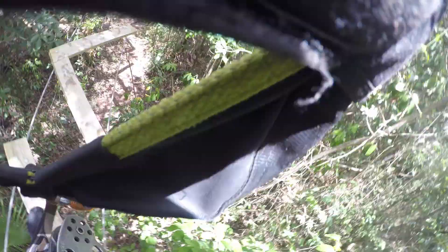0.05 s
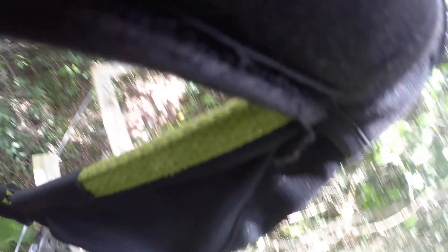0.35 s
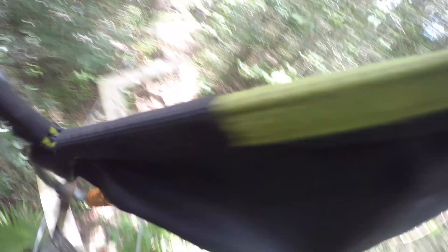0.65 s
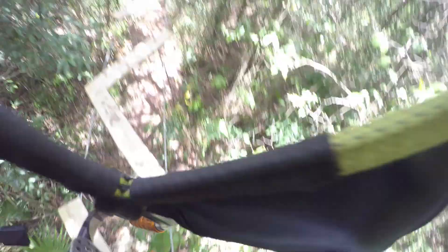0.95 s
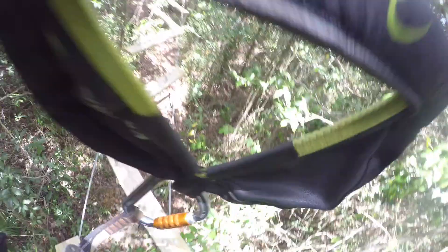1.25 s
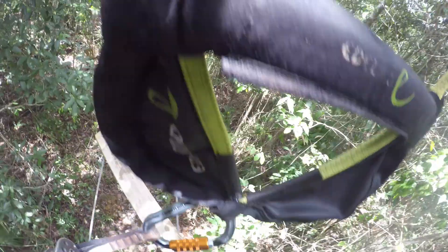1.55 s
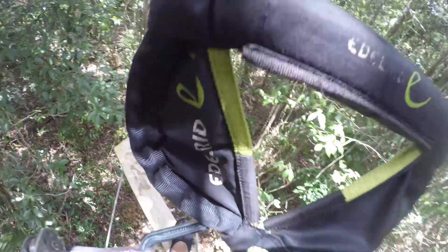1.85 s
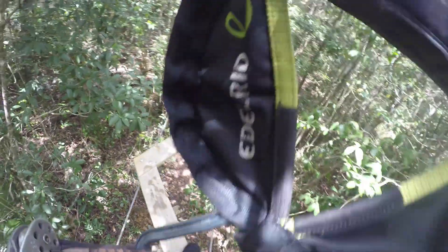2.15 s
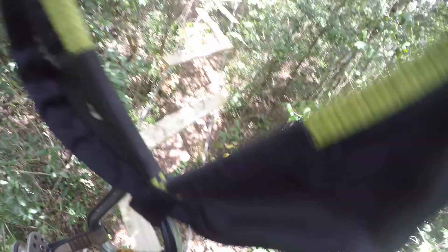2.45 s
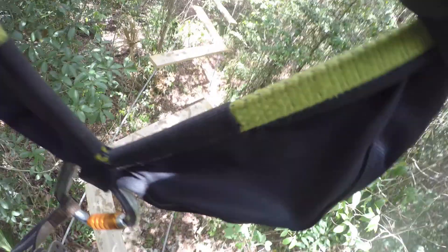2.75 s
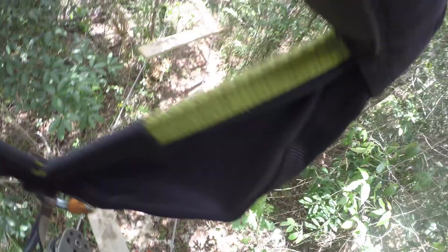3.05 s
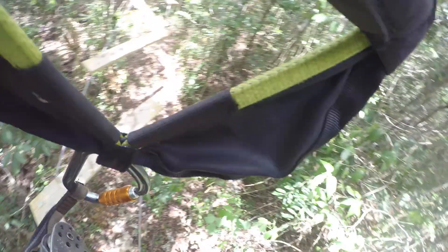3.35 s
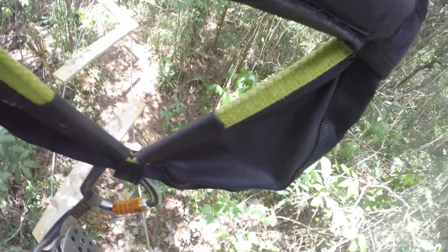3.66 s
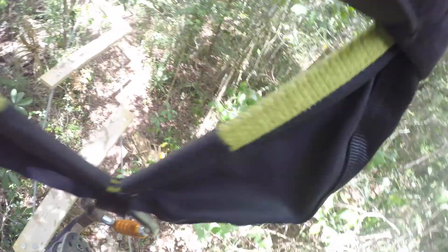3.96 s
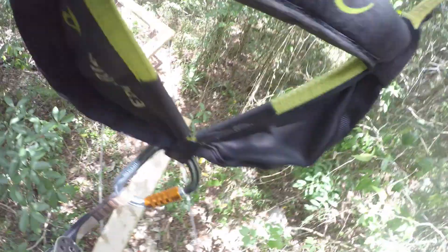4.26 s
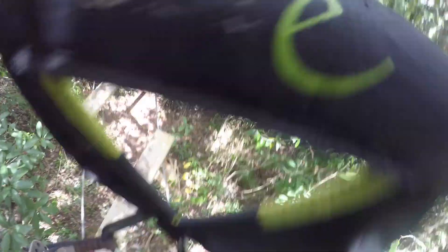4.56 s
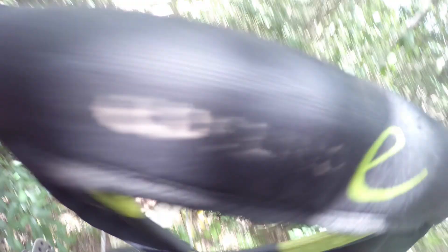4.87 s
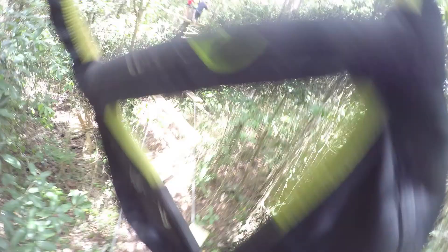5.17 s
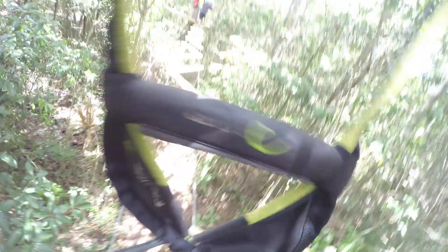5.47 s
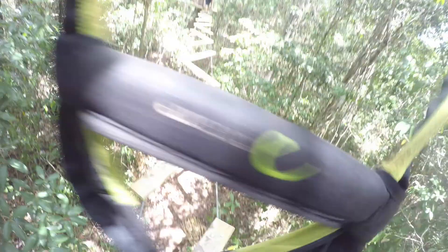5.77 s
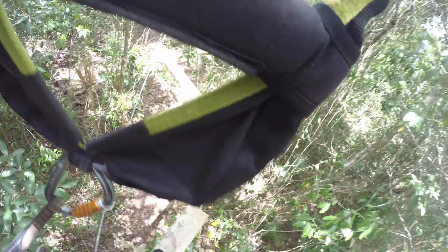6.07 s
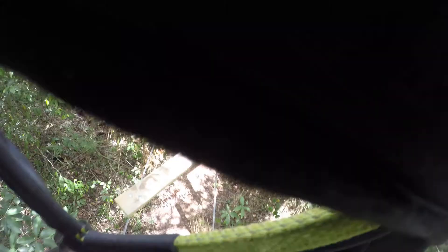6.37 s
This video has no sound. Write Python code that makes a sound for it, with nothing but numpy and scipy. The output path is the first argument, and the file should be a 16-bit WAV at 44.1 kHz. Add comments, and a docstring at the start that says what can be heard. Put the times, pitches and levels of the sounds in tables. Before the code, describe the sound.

Zip line gear sounds very close to a body-worn microphone, outdoors with no echo. Cloth rustle and low buffeting swell and fade throughout. Nylon swishes, light knocks and tiny high tinkles open the sound. From 0.5 to 0.8 seconds come heavy low thumps, gritty strap cracks and a hard steel clank, trailing into rubbing. After a lull from 1 to 1.7 seconds, the pulley ticks quickly and lightly along the cable with a faint whirr, continuing unevenly until about 6 seconds. Between 1.8 and 3.2 seconds carabiners knock hollowly and scrape, loudest near 2.1, 2.4 and 2.7. A quieter stretch follows with rustling and scattered knocks, including a dull bump at 4.7 and a jolt at 5.4. At 6.3 seconds the loudest thump and a sharp strap crunch briefly overload the microphone, leaving soft nylon hiss until about 6.6.

```python
"""Hollow metal knocks, scrapes and quick ticks sound over rustling cloth and low thumps.
A rider hangs from a zip line in a wood, with a small cased camera worn next to the gear.
Carabiners (steel clips) and the pulley knock and slide, the pulley taps the cable's strands,
and straps crunch over the case. Jolts reach the microphone as thumps; the hardest overload it."""
import sys
import numpy as np
from scipy import signal
from scipy.fft import rfft, irfft
from scipy.io import wavfile
from scipy.ndimage import uniform_filter1d

SR = 44100
rng = np.random.default_rng(int(sys.argv[2]) if len(sys.argv) > 2 else 0)


def generate_wav(sig):
    """Save sig (samples, or channels by samples) to the path in sys.argv[1] as 16-bit PCM at SR."""
    pcm = np.round(np.clip(np.atleast_2d(sig).T, -1, 1) * 32767).astype(np.int16)
    wavfile.write(sys.argv[1], SR, pcm)


N = 291942

# the dull tone of cloth and slings: f/Hz, level/dB
CLOTH_TONE = [(80, -19), (170, -3.5), (290, -0.5), (420, -5), (560, -2), (770, 1), (1000, -4),
              (1350, -13.5), (1650, -8.5), (1900, -9.5), (2300, -18), (3000, -27), (9000, -52)]
# modes (pitches a thing rings at) of the pulley's side plates: f/Hz, width/Hz, level/dB
PULLEY_MODES = [(2600, 240, 2), (3840, 170, -1.5), (4600, 300, -3), (5980, 330, -4.5), (8100, 600, -10.5),
                (9240, 440, -10), (12400, 3000, -15)]
# modes of the case's shell: f/Hz, width/Hz, level/dB
SHELL_MODES = [(1870, 300, 5.5), (1650, 100, -16.5)]


def undb(db):
    """Turn decibels into a gain to multiply by."""
    return 10 ** (np.asarray(db) / 20)


def level(x, db):
    """Scale to an average (rms) level."""
    return x * undb(db) / np.sqrt(np.mean(x ** 2) + 1e-20)


def peak(x, db):
    """Scale to a peak level."""
    return x * undb(db) / (np.abs(x).max() + 1e-20)


def during(x, length, db):
    """Scale to an average level, as if all the sound fell within length seconds."""
    return x * undb(db) * np.sqrt(length * SR / np.sum(x ** 2))


def add(track, s, x):
    """Mix a sound into the track at s seconds."""
    i = max(int(s * SR), 0)
    track[i:i + len(x)] += x[:max(N - i, 0)]


def clock(size=4096):
    """The time of each sample in seconds."""
    return np.arange(size) / SR


def follow(curve, column=1):
    """Join a table's points with straight lines over the whole scene."""
    columns = np.transpose(curve)
    return np.interp(clock(N), columns[0], columns[column])


def keep(x, hz, kind, order=2):
    """Keep the "low" or the "high" side of hz."""
    return signal.sosfilt(signal.butter(order, hz, kind, fs=SR, output="sos"), x)


def ring(push, modes, stretch=1):
    """Make modes ring, their pitches times stretch; neighbours swing opposite ways."""
    out = 0
    for k, (hz, width, db) in enumerate(modes):
        resonance = signal.iirpeak(hz * stretch, hz / width, fs=SR)
        out += (-1) ** k * undb(db) * signal.lfilter(*resonance, push)
    return out


def colour(x, tone):
    """Turn each pitch up or down along a tone curve."""
    hz, db = np.transpose(tone)
    f = np.arange(len(x) // 2 + 1) * SR / len(x)
    gain = undb(np.interp(np.log(f + 1), np.log(hz), db))
    return irfft(rfft(x) * gain, len(x))


def flutter(rate, spread_db):
    """A gain that wanders smoothly, taking a new turn rate times a second."""
    hold = int(SR / rate)
    steps = np.repeat(rng.standard_normal(N // hold + 1), hold)
    return undb(spread_db * level(uniform_filter1d(steps, hold)[:N], 0))


def slips(size, rate, scatter_db):
    """Surfaces stick and slip: tiny random pushes, about rate a second."""
    pushes = (rng.random(size) < rate / SR) * rng.choice([-1, 1], size)
    strength = undb(scatter_db * rng.standard_normal(size))
    return pushes * strength + 1e-3 * rng.standard_normal(size)


def stroke(length, rate, scatter_db):
    """A run of slips that swells and stops, with silence after it for the ring."""
    size = int(length * SR)
    return np.pad(slips(size, rate, scatter_db) * signal.windows.tukey(size, .35), (0, 1024))


def contact(chatter, decay_s):
    """One sharp push, then brief chatter of the surfaces."""
    t = clock()
    return (t == 0) + chatter * rng.standard_normal(len(t)) * np.exp(-t / decay_s)


def sway():
    """Air and the swinging body buffet the case; cloth rustles along and swells as the harness shifts."""
    # how hard the rider swings: t/s, level/dB
    swinging = [(0, -32), (.58, -29.5), (.95, -40.5), (1.03, -50.5), (1.64, -53), (1.83, -36),
                (2.38, -35.5), (2.58, -44.5), (2.9, -39), (3.1, -35.5), (3.62, -39.5), (4.15, -40.5),
                (4.42, -36), (4.88, -38), (5.318, -34), (5.82, -47), (6.08, -37), (6.5, -50.5)]
    # harness shifts: t/s of the top, rise/s, fall/s, rustle/dB, hiss/dB
    shifts = [(.09, 0.046, 0.51, -39, -50.5), (.4, 0.038, 0.19, -31, -47),
              (0.581, 0.093, 0.088, -32, -43.5), (1.33, 0.075, 0.21, -51, -66),
              (1.598, .06, 0.39, -55, -64), (2.481, 0.062, 0.075, -42, -54),
              (2.82, 0.33, 0.082, -44.5, -75), (3.1, 0.054, 0.2, -41.5, -78),
              (3.479, 0.1, 0.095, -40, -50.5), (3.7, 0.041, 0.068, -50.5, -59),
              (4.42, 0.074, 0.14, -41, -56.5), (4.71, 0.05, 0.094, -38, -54.5),
              (5, 0.099, 0.23, -45.5, -55), (5.161, 0.018, 0.09, -43, -49),
              (5.286, 0.029, 0.033, -35.5, -51.5), (5.458, 0.06, 0.13, -39, -57.5),
              (6.2, 0.076, 0.24, -50, -61.5), (6.61, 0.12, 0.054, -50, -50)]
    # the low rumble of buffeting: f/Hz, level/dB
    buffet_tone = [(12, -22), (25, 8.5), (45, 1), (72, 1), (105, -3.5), (160, -14.5), (260, -24.5),
                   (600, -62.5)]
    # the bright side of rubbing cloth: f/Hz, level/dB
    hiss_tone = [(1200, -12.5), (2000, 0.5), (3100, -4), (4100, 3), (5200, -6), (6100, -10.5), (7500, -7),
                 (8600, -17), (9700, -11.5), (11500, -21), (13000, -22), (16000, -26.5)]
    t = clock(N)
    motion = undb(follow(swinging))
    rustle_gain, hiss_gain = motion * undb(-14.5), motion * undb(-23.5)
    for s, rise, fall, rustle_db, hiss_db in shifts:
        distance = (t - s) / np.where(t < s, rise, fall)
        swell = undb(-17 * np.minimum(distance ** 2, 20))  # 17 dB down one rise before, one fall after
        rustle_gain = np.hypot(rustle_gain, swell * undb(rustle_db))
        hiss_gain = np.hypot(hiss_gain, swell * undb(hiss_db))
    buffet = level(colour(rng.standard_normal(N), buffet_tone), 0)
    buffet *= motion * flutter(rate=19, spread_db=2.7)
    rustle = level(colour(slips(N, rate=2600, scatter_db=1), CLOTH_TONE), 0)
    rustle *= rustle_gain * flutter(rate=45, spread_db=3)
    hiss = level(colour(slips(N, rate=8000, scatter_db=6.5), hiss_tone), -3.9)
    hiss *= hiss_gain * flutter(rate=35, spread_db=2.6)
    return buffet + rustle + hiss


def nylon_swishes():
    """Smooth nylon brushes past the camera with a soft, bright hiss."""
    # passes of the fabric: t/s, length/s, level/dB
    passes = [(0, 0.088, -42), (0.214, 0.058, -44.5), (6.425, 0.083, -54), (6.549, 0.23, -52)]
    # the tone of sliding nylon: f/Hz, level/dB
    nylon_tone = [(2000, -2.5), (3500, -7), (4700, -1.5), (6100, -5), (7800, -8.5), (9500, -20),
                  (12000, -19.5), (16000, -22)]
    out = np.zeros(N)
    for s, length, db in passes:
        push = stroke(length, rate=6600, scatter_db=4)
        add(out, s, during(colour(push, nylon_tone), length, db))
    return out


def pulley_whirr():
    """The pulley rolls over the twisted strands with a fine whirr; a dulled drone comes down the sling."""
    # strength of the rolling: t/s, level/dB
    rolling = [(0, -87), (1.4, -75.5), (2.05, -77.5), (2.25, -56.5), (2.55, -59.5), (2.9, -63.5),
               (3.2, -77.5), (3.601, -64), (4.4, -69), (4.75, -70), (5.251, -79), (5.751, -60.5),
               (6.049, -65), (6.4, -66.5)]
    plates = ring(slips(N, rate=400, scatter_db=5), PULLEY_MODES)
    whirr = level(keep(plates, 1600, "high"), -.5)
    drone = level(colour(slips(N, rate=11000, scatter_db=3), CLOTH_TONE), -1.5)
    return (whirr + drone) * undb(follow(rolling))


def cable_chirp(start_hz=4070, end_hz=1870, glide_s=.0007, rise_s=.00088, decay_s=.002):
    """High pitches run faster along a cable, so a tap arrives as a tiny falling chirp."""
    t = clock(1024)
    hz = end_hz + (start_hz - end_hz) * np.exp(-t / glide_s)
    envelope = (1 - np.exp(-t / rise_s)) * np.exp(-t / decay_s)
    return peak(np.sin(2 * np.pi * np.cumsum(hz) / SR) * envelope, 0)


def strand_ticks(scatter_db=1.5, rebound_s=.01, rebound_db=-4.5, strays_per_s=19, rattle_s=.0023):
    """The pulley taps each strand and rebounds: the cable chirps and the side plates rattle."""
    # the pulley's run: t/s, strands passed per second, chirp/dB, push on the plates/dB
    run = [(0, 21, -71.5, -46.5), (1.45, 15.6, -53.5, -52), (1.699, 15.1, -44.5, -35.5),
           (2.08, 27.7, -51.5, -46.5), (2.3, 39, -39, -37.5), (2.578, 44, -42.5, -34),
           (2.798, 44, -61, -41), (2.941, 35.5, -51, -34.5), (3.08, 16, -39.5, -37.5),
           (3.55, 26, -39.5, -49), (3.8, 24.1, -40, -37.5), (4.651, 24.4, -38.5, -35.5),
           (4.818, 20, -69, -40), (5.201, 16.7, -80, -40), (5.56, 40.3, -46.5, -44), (5.78, 45, -43, -31),
           (5.972, 49, -50, -42.5), (6.4, 27, -77, -56)]
    t = clock(N)
    passed = np.cumsum(follow(run)) / SR
    taps = np.zeros(N)
    for strand, (offset, tap_luck, lag, rebound_luck) in enumerate(rng.standard_normal((260, 4))):
        s = np.interp(strand + .32 * offset, passed, t, right=2 * t[-1])  # unreached strands stay silent
        add(taps, s, undb([scatter_db * tap_luck]))
        add(taps, s + rebound_s * (1 + .26 * lag), undb([rebound_db + scatter_db * rebound_luck]))
    # weaker stray ticks come from the pulley alone
    strays = (rng.random(N) < strays_per_s / SR) * undb(-11.5 + 6 * rng.standard_normal(N))
    bursts = signal.oaconvolve(taps + strays, np.exp(-clock(1024) / rattle_s))[:N]
    rattle = keep(ring(bursts * rng.standard_normal(N), PULLEY_MODES), 2000, "high")
    chirps = signal.oaconvolve(taps * undb(follow(run, column=2)), cable_chirp())[:N]
    return chirps + rattle * undb(follow(run, column=3))


def gear_body(push, hz):
    """The hollow low ring of the steel gear; its pitch shifts with the load and the point of contact."""
    # loaded steel damped by its slings, when hz is 770: f/Hz, width/Hz, level/dB
    modes = [(550, 160, 0.5), (722, 83, 17.5), (1016, 140, 3.5)]
    return keep(keep(ring(push, modes, hz / 770), 330, "high"), 2100, "low")


def gear_clank(push):
    """The higher ring of the gear; the slings pass little above it."""
    # upper modes of the steel: f/Hz, width/Hz, level/dB
    modes = [(1240, 110, -1), (1493, 200, 1), (1906, 120, 11), (2106, 280, 1.5)]
    clank = ring(push, modes, stretch=1 + .057 * rng.standard_normal())
    return keep(keep(clank, 2450, "low", order=6), 820, "high")


def case_grit(push, top_hz):
    """The gritty ring of the camera case; a softer contact reaches less far up."""
    # bright modes of the case: f/Hz, width/Hz, level/dB
    modes = [(3540, 1900, -2), (4750, 1100, 0.5), (5900, 810, 0.5), (6500, 1200, -2), (7630, 1200, -7),
             (10150, 270, -10), (13500, 2200, -13.5)]
    return keep(keep(ring(push, modes), 1800, "high"), top_hz, "low")


def camera_swing(db, hz, cycles):
    """The camera swings briefly on its mount; more cycles make it swell and fade more slowly."""
    t = clock(8192)
    age = t * hz / cycles
    return peak(-np.sin(2 * np.pi * hz * t) * age * np.exp(-age ** 1.4), db)


def steel_knocks():
    """Steel meets steel with a clank and a click; the jolt runs down the sling and shakes the case."""
    # hits of the gear, mostly carabiners and the pulley, before the trims below: t/s, body/dB, body f/Hz,
    # clank/dB, click/dB, jolt/dB
    hits = [(.059, -31, 687, -28, -40, -15), (.183, -5, 708, -15.5, -27, -16.5),
            (.274, -24, 980, -24, -37, -32), (0.312, -18.5, 1210, -16, -53, -37),
            (.614, -18, 660, -58, -24, -11), (.679, 1.5, 780, 3, 2, -1), (1.4, -39, 830, -35, -64, -32),
            (1.722, -33.5, 770, -40.5, -72, -57), (1.809, -17.5, 670, -17, -30, -41),
            (1.835, -21, 790, -34, -32, -37), (1.95, -17.5, 783, -22, -47, -33),
            (2.0638, 1, 801, -6, -17.5, -14.5), (2.073, -21, 680, -13, -37, -55),
            (2.141, -12.5, 800, -18, -40, -34), (2.272, -6, 928, -16, -27.5, -26.5),
            (2.363, -2.5, 770, -10.5, -31, -12), (2.372, -3.5, 830, -2.5, -19.5, -12),
            (2.679, -7.5, 844, -12.5, -25.5, -19.5), (2.706, -9, 770, -13, -14.5, -7),
            (2.727, -2, 824, -7, -31, -14.5), (2.739, -14, 840, -15.5, -44, -43),
            (2.757, -15.5, 747, -14.5, -44, -19), (2.802, -23.5, 784, -37, -55, -33),
            (2.961, -25.5, 825, -27.5, -36, -23.5), (3.013, -10.5, 810, -10.5, -32, -13.5),
            (3.02, -11, 786, -18, -38, -25), (3.045, -19, 640, -16.5, -28.5, -22),
            (3.15, -20, 760, -24, -51, -19.5), (3.377, -25.5, 690, -22, -49, -22),
            (3.421, -25, 765, -41, -55, -24.5), (4.014, -34.5, 620, -35, -46, -32.5),
            (4.202, -27.5, 818, -32, -60, -30), (4.233, -35.5, 708.6, -45, -63, -29.5),
            (4.314, -30, 880, -28.5, -45, -24.5), (4.429, -19, 745, -25.5, -30, -23.5),
            (4.677, -20.5, 780, -21.5, -16, -13), (5.066, -19, 727, -15.5, -27, -14.5),
            (5.239, -14, 740, -33, -49, -17), (5.348, -18, 900, -15.5, -32.5, -33),
            (5.397, -13.5, 770, -16.5, -18, -7), (5.469, -21, 770, -48, -35, -25.5),
            (5.545, -24, 689, -38, -60, -32), (6.03, -30, 696, -23.5, -34, -44),
            (6.055, -26.5, 770, -24.5, -50, -33), (6.086, -22.5, 756, -20.5, -56, -35),
            (6.262, -17.5, 664, -15, 2.5, -24), (6.594, -32, 700, -49, -46, -31.5)]
    # low modes of the case: f/Hz, width/Hz, level/dB
    thud_modes = [(222, 81, 0), (396, 34, 2.5), (577, 34, 2), (1280, 56, -6)]
    out = np.zeros(N)
    for s, body_db, hz, clank_db, click_db, jolt_db in hits:
        push = contact(chatter=.04, decay_s=.005)
        click = case_grit(contact(chatter=.091, decay_s=.0044), top_hz=8100)
        thud = keep(ring(contact(chatter=.049, decay_s=.0044), thud_modes), 1900, "low", order=3)
        steel = peak(gear_body(push, hz), body_db) + peak(gear_clank(push), clank_db - .5)
        add(out, s - .0004, steel + peak(click, click_db - 7.5))
        add(out, s, peak(thud, jolt_db - 6))
        add(out, s + .00061, camera_swing(jolt_db, hz=80, cycles=.72))
    return out


def strap_snaps():
    """Seams and buckles snap over the case: a bright crack and a ring of the shell."""
    # snaps: t/s, peak of the crack/dB
    snaps = [(.06, -18), (.083, -20.5), (0.391, -23.5), (0.5328, -18.5), (.6091, -12), (0.629, -5),
             (.6355, -2), (0.648, -7.5), (.6955, -3), (.708, -14), (0.7208, -9), (0.7242, -13),
             (0.746, -15.5), (5.173, -28), (6.29, -5), (6.31, 5), (6.3171, -4), (6.332, -17.5),
             (6.342, -21)]
    out = np.zeros(N)
    for s, db in snaps:
        push = contact(chatter=.082, decay_s=.002)
        crack = peak(case_grit(push, top_hz=13000), db)
        shell = peak(keep(ring(push, SHELL_MODES), 3300, "low"), db - 7)
        add(out, s - .0005, crack + shell)
    return out


def gate_tinkles():
    """The loose gate of a carabiner taps and rings very high."""
    # taps of the gate: t/s, peak/dB
    taps = [(.157, -49), (.175, -54), (.282, -53), (.3, -48), (0.335, -45), (1.808, -40), (1.835, -57),
            (2.065, -55.5), (3.046, -52), (3.243, -45.5)]
    # modes of the gate: f/Hz, width/Hz, level/dB
    modes = [(9220, 290, -21.5), (11000, 340, 6.5), (12400, 410, 4)]
    out = np.zeros(N)
    for s, db in taps:
        tinkle = ring(contact(chatter=.073, decay_s=.002), modes)
        add(out, s, peak(keep(tinkle, 8000, "high"), db))
    return out


def strap_rubs():
    """The weave of a strap catches on the case: a low drag, a ring of the shell and grit."""
    # pulls of the strap, before the trims below: t/s, length/s, drag/dB, shell/dB, grit/dB
    pulls = [(0.183, 0.028, -23, -34, -66), (0.61, 0.021, -10.5, -21.5, -31), (0.619, 0.023, -23, -14, -17),
             (0.636, 0.023, -21, -25, -26), (.678, 0.0078, -2, -26, -5),
             (0.688, 0.053, -28.5, -27.5, -25.5), (.738, 0.041, -27.5, -34.5, -37.5),
             (0.789, .018, -59, -44, -44.5), (0.888, 0.066, -26.5, -36.5, -41.5),
             (0.961, 0.031, -41.5, -47.5, -48), (3.83, 0.014, -38.5, -63, -64),
             (4.682, 0.0166, -27, -41, -28.5), (5.399, 0.03, -25.5, -65, -62),
             (6.262, 0.0069, -5, -21, -16), (6.274, 0.0165, -15, -20.5, -32), (6.299, 0.016, -14, -28, -21),
             (6.317, 0.024, -32.5, -28.5, -35.5)]
    # the low tone of the drag: f/Hz, level/dB
    drag_tone = [(60, -7), (130, 5.5), (330, 0.5), (550, -5.5), (800, -11.5), (1100, -13.5), (1500, -33.5),
                 (3000, -63.5)]
    out = np.zeros(N)
    for s, length, drag_db, shell_db, grit_db in pulls:
        push = stroke(length, rate=2200, scatter_db=4.5)
        drag = during(colour(push, drag_tone), length, drag_db)
        shell = keep(ring(push, SHELL_MODES), 2400, "low")
        grit = case_grit(push, top_hz=14000 * undb(.085 * grit_db))  # a harder pull is brighter
        add(out, s, drag + during(shell, length, shell_db - 3) + during(grit, length, grit_db - 5))
    return out


def body_thumps():
    """The rider's body and harness bump the camera and set it swinging."""
    # bumps: t/s, peak/dB, f/Hz, swell time/cycles
    bumps = [(0.286, -16.5, 38.5, 1.07), (.454, -13.5, 58, .36), (0.518, -8.5, 36, 0.86),
             (0.552, -1.5, 48.3, 0.46), (0.605, -6, 46, 0.84), (0.691, -5.5, 39, 0.21),
             (.718, -10, 35.3, .62), (0.884, -19, 75, 0.46), (1.796, -38, 59.6, 1.2), (2.353, -9, 61, 0.55),
             (2.377, -5.5, 80, 0.81), (2.418, -21, 45, 0.83), (2.726, -8.5, 39.6, 0.38),
             (3.161, -20, 99, 0.89), (3.723, -28, 32.6, 0.71), (3.925, -31, 360, 1.44),
             (4.013, -29.5, 227, 0.8), (4.636, -35.5, 288, 1.8), (4.677, -12, 357, 1.03),
             (4.687, -6, 28.7, 0.66), (4.902, -29, 231, 1.35), (6.267, 10, 77.7, 0.46),
             (6.278, -13, 35.8, 0.44), (6.307, -10, 45.5, 0.54)]
    out = np.zeros(N)
    for s, db, hz, cycles in bumps:
        add(out, s, camera_swing(db, hz, cycles))
    return out


def steel_scrapes():
    """Carabiners slide under load and judder, making the steel ring."""
    # slides: t/s, length/s, body level/dB, body f/Hz
    slides = [(.37, 0.012, -33.5, 940), (1.781, .02, -33.5, 756), (1.811, 0.041, -24.5, 718),
              (1.855, 0.047, -30.5, 745), (1.91, 0.048, -30.5, 713), (1.99, 0.11, -28.5, 762),
              (2.04, 0.0073, -36, 1000), (2.104, 0.16, -40.5, 783), (2.15, 0.015, -24, 905),
              (2.231, 0.0077, -26, 1000), (2.283, 0.032, -31.5, 793), (2.986, 0.042, -29.5, 980),
              (3.015, 0.094, -30.5, 770), (4.395, 0.17, -39.5, 815.7), (5.996, 0.09, -41, 793)]
    out = np.zeros(N)
    for s, length, db, hz in slides:
        push = stroke(length + .0053, rate=4600, scatter_db=0)
        body = during(gear_body(push, hz), length, db)
        clank = during(gear_clank(push), length, db - 12)
        add(out, s - .003, body + clank)
    return out


def scene():
    """All the gear, close to one microphone and with no walls to echo it."""
    steel = steel_knocks() + gate_tinkles() + steel_scrapes()
    fabric = strap_rubs() + strap_snaps() + nylon_swishes()
    pulley = pulley_whirr() + strand_ticks()
    rider = body_thumps() + sway()
    return (steel + fabric + pulley + rider)[None]


def record(dry):
    """The hardest blows are flattened at full scale, then the highest treble is cut."""
    treble_cut = signal.ellip(8, .2, 70, 15350, fs=SR, output="sos")
    return signal.sosfilt(treble_cut, np.clip(dry, -1, 1))


dry = scene()
out = record(dry)
generate_wav(out)
```